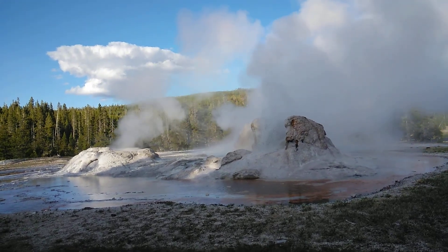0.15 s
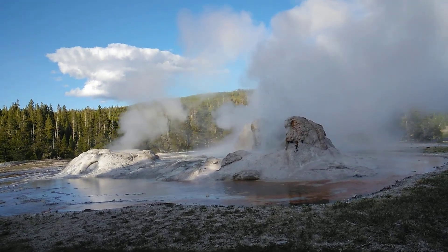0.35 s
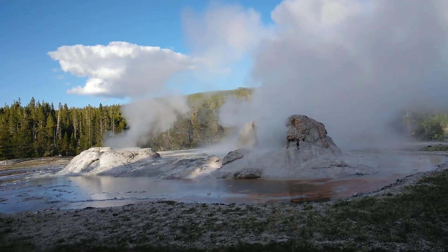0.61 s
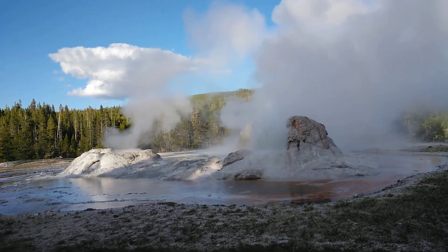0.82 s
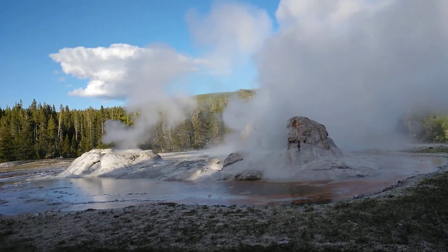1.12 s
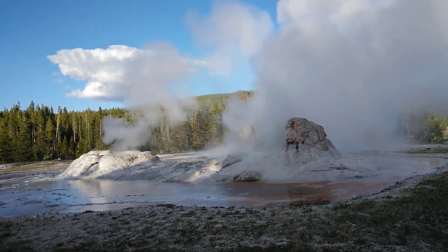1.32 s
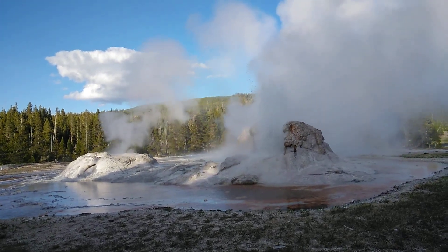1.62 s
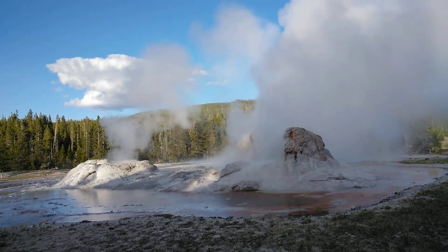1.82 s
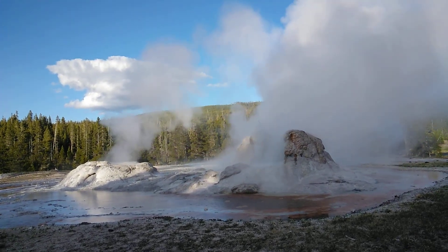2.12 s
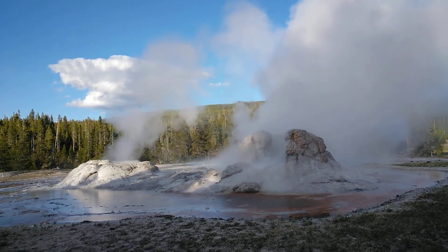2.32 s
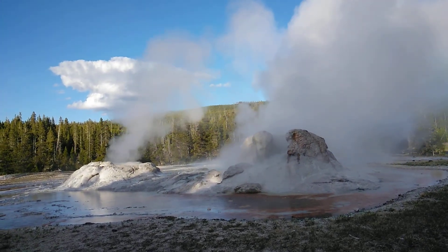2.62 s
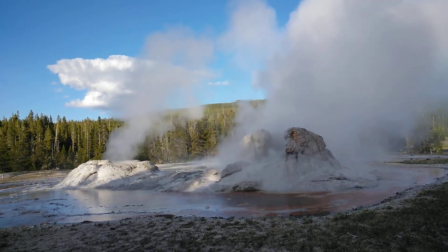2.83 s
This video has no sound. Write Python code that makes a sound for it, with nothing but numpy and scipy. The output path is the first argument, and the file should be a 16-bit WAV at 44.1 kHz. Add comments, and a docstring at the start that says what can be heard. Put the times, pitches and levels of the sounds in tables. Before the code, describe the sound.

Geyser eruption: bright steamy spray swells, crackles with sharp water slaps, then sinks to thin hiss

```python
"""A geyser throws up water and steam in surges: noise for the steam, random impacts for the spray.
Lumps of water slap on wet rock as short ringing bursts, and heavier water falls back with a duller spatter.
The pool churns below as noise with rising bubble tones; one low thud marks a mass of water landing.
A steady vent hisses to the left over a low wind rumble, both filtered noise.
The two microphone sides are almost opposed in the bass; the left is much brighter."""
import sys
import numpy as np
from scipy import signal
from scipy.fft import rfft, irfft, next_fast_len
from scipy.io import wavfile
from scipy.ndimage import uniform_filter1d, map_coordinates

SR = 44100
rng = np.random.default_rng(int(sys.argv[2]) if len(sys.argv) > 2 else 0)


def generate_wav(signal):
    """Clip the signal to [-1, 1] and save it as 16-bit WAV at the path in sys.argv[1]."""
    frames = np.transpose(np.atleast_2d(signal))
    scaled = np.clip(frames, -1, 1) * 32767
    pcm = np.round(scaled).astype(np.int16)
    wavfile.write(sys.argv[1], SR, pcm)


N = 132300

# Spectrum of spray and slaps. Each row: frequency in Hz, relative density in dB per Hz.
SPRAY_COLOUR = [(900, -33.5), (1320, -18.5), (1600, -15), (2000, -16), (2400, -12.5), (2750, -7.5),
                (3150, -13), (3600, -14.5), (4050, -9), (4400, -4), (4980, 1), (5600, -6.5), (6500, -8.5),
                (7600, -5.5), (8400, -7), (9700, -2), (11500, -5.5), (12700, -12), (14300, -23),
                (15500, -46)]


def amp(db):
    """Decibels to gain."""
    return 10 ** (np.asarray(db) / 20)


def unit(x):
    """Scaled to rms 1."""
    return x / np.sqrt(np.mean(x ** 2) + 1e-20)


def along(points, hz):
    """(Hz, value) points interpolated on a log frequency axis."""
    f, v = np.transpose(points)
    return np.interp(np.log(hz + 1), np.log(f + 1), v)


def curve(rows):
    """(s, value) points interpolated to one value per sample."""
    return np.interp(np.arange(N) / SR, *np.transpose(rows))


def wobble(knots_per_s):
    """A smooth random curve through normally distributed knots."""
    knots = rng.standard_normal(1024)
    return map_coordinates(knots, [np.arange(N) * knots_per_s / SR], mode="wrap")


def coloured(x, spectrum):
    """x through a minimum-phase filter with the given spectrum and unit power gain."""
    m = 2 * next_fast_len(N)
    gain = unit(amp(along(spectrum, np.fft.rfftfreq(m, 1 / SR))))
    cepstrum = irfft(np.log(gain + 1e-6))
    # fold the cepstrum to make the filter causal
    cepstrum[1:m // 2] *= 2
    cepstrum[m // 2 + 1:] = 0
    response = np.exp(rfft(cepstrum))
    return irfft(rfft(x, m) * response, m)[..., :N]


def patchy(x):
    """Flickers from band to band: random gain patches, some hundred Hz wide and tens of ms long."""
    patch_rms_db = 1
    z = signal.stft(x, nperseg=512)[2]
    patches = rng.standard_normal(z.shape[1:])
    patches = uniform_filter1d(patches, size=8, axis=0)  # bins
    patches = uniform_filter1d(patches, size=6, axis=1)  # frames
    return signal.istft(z * amp(patch_rms_db * unit(patches)), nperseg=512)[1][:, :N]


def bursts(power, t60_s):
    """Two noises that flare at each contact and die away."""
    keep = np.exp(-2 * np.log(1000) / (t60_s * SR))  # power kept per sample
    envelope = np.sqrt(signal.lfilter([1], [1, -keep], power))
    return envelope * rng.standard_normal((2, N))


def drops(rate_per_s, spread_db, t60_s):
    """Random impacts of many sizes, at rms 1."""
    size = amp(spread_db * np.minimum(rng.standard_normal(N), 2.7))
    hits = rng.random(N) < rate_per_s / SR
    return unit(bursts(hits * size ** 2, t60_s))


def bubbles(rate_per_s, centre_hz, octaves, life_cycles):
    """Decaying tones of scattered size and pitch that rise as they fade, at rms 1."""
    rise_per_life = 0.13  # fraction of the starting pitch
    start, pitch, size, turn = rng.random((int(rate_per_s * N / SR), 4)).T[:, :, None]
    n = np.arange(SR // 40)
    cycles = centre_hz * 2 ** (octaves * (pitch - .5)) * n / SR
    age_lives = cycles / life_cycles
    strength = amp(23.5 * size - 22.6 * age_lives)
    phase = 2 * np.pi * cycles * (1 + rise_per_life * age_lives / 2)
    at = ((start * N).astype(int) + n).ravel()
    sides = []
    for shift in (0, 2 * np.pi * turn):  # random phase between the two channels
        tones = strength * np.sin(phase + shift)
        sides.append(np.bincount(at, tones.ravel(), N)[:N])
    return unit(np.array(sides))


def spray():
    """Steam noise, drop impacts and tiny ringing bubbles share the surge; drops arrive in clumps."""
    # Strength of the eruption. Each row: time in seconds, level in dB before the layer gains.
    surge = [(0, -46), (.2, -44), (.35, -41), (.46, -34), (.55, -36), (.65, -31.5), (.72, -35), (.84, -34),
             (.95, -30.5), (1.03, -27.5), (1.09, -27), (1.15, -30.5), (1.35, -33), (1.57, -38.5),
             (1.67, -35.5), (1.9, -36), (2.1, -32.5), (2.4, -34), (2.53, -35.5), (2.7, -40.5),
             (2.88, -53.5), (3, -55.5)]
    steam_db, patter_db, plink_db = 3.5, 1, -6
    steam = amp(steam_db) * rng.standard_normal((2, N))
    clumps_db = 1.0 * wobble(29.76) + 2.14 * wobble(100)
    impacts = drops(rate_per_s=3900, spread_db=3, t60_s=0.0018)
    patter = amp(patter_db) * unit(amp(clumps_db) * impacts)
    # drops that ring in the wet
    plinks = amp(plink_db) * bubbles(rate_per_s=700, centre_hz=5090, octaves=2.665, life_cycles=41)
    mix = patchy(steam + patter) + plinks
    return coloured(amp(curve(surge)) * mix, SPRAY_COLOUR)


def slaps():
    """Lumps of water spread and burst on rock; the air pocket under each rings briefly."""
    # Each row: start in seconds, relative level in dB, burst t60 in seconds, ring in Hz.
    lumps = [(.400, -28, .012, 5000), (.4544, -23.5, .02, 5000), (.4665, -21, .03, 5000),
             (.473, -25, .018, 5000), (.4998, -26, .022, 5100), (.532, -26, .025, 6500),
             (.581, -25.5, .018, 4800), (.6078, -22.5, .014, 4100), (.6365, -24, .018, 4900),
             (.6648, -20, .006, 7500), (.6688, -14.5, .012, 4400), (.6822, -17, .009, 4000),
             (.7638, -13, .004, 7300), (.799, -19, .004, 5000), (.8845, -16, .012, 5700),
             (.9125, -22, .01, 4800), (.9822, -18, .012, 5000), (1.0295, -10, .005, 5000),
             (1.034, -12, .011, 9500), (1.056, -14, .009, 5200), (1.0795, -13, .008, 5000),
             (1.0882, -5, .009, 9500), (1.116, -15, .007, 7000), (1.1915, -13, .007, 9500),
             (1.2612, -15, .005, 7500), (1.6945, -19, .01, 5100), (1.996, -21, .025, 6000),
             (2.538, -18, .007, 5000), (2.607, -20, .008, 4000), (2.836, -31, .012, 9000)]
    rise_s, ring_db, ring_q = .0005, 4, 5
    out = np.zeros((2, N + SR))
    t = np.arange(SR // 10) / SR
    for start_s, level_db, t60_s, ring_hz in lumps:
        envelope = amp(level_db - 60 * t / t60_s) * (1 - np.exp(-t / rise_s))
        burst = envelope * rng.standard_normal((2, len(t)))
        ring = signal.lfilter(*signal.iirpeak(ring_hz, ring_q, SR), burst)
        first = round(start_s * SR)
        out[:, first:first + len(t)] += (burst + amp(ring_db) * ring) / 2
    return coloured(out[:, :N], SPRAY_COLOUR)


def splash():
    """Heavier water falls back: dense, longer impacts with a duller spectrum."""
    # Each row: time in seconds, level in dB before the layer gain.
    fall = [(0, -47.5), (.17, -46), (.3, -46), (.48, -40.5), (.6, -45), (.68, -37.5), (.73, -45),
            (.85, -46.5), (1.06, -39), (1.35, -46), (1.57, -44), (1.7, -41.5), (2.02, -41), (2.1, -34),
            (2.2, -38.5), (2.5, -39.5), (2.6, -44.5), (2.72, -44), (2.82, -56), (3, -73)]
    # Each row: frequency in Hz, relative density in dB per Hz.
    colour = [(900, -26.5), (1350, -3.5), (1600, 5.5), (2000, -1), (2400, 5.5), (2750, 0.5), (3050, -6),
              (3400, 1.5), (4200, 2), (6000, -1), (10000, -36)]
    gain_db = 3.5
    spatter = coloured(patchy(drops(rate_per_s=1900, spread_db=0.5, t60_s=0.016)), colour)
    return amp(curve(fall) + gain_db + 0.13 * wobble(27.1)) * unit(spatter)


def thud():
    """The ground gives one low thud as a mass of water lands: decaying noise, alike on both sides."""
    # Each row: frequency in Hz, relative density in dB per Hz.
    colour = [(30, -15), (60, 4), (130, -6), (250, -1.5), (400, -21), (900, -53)]
    start_s, level_db, rise_s, t60_s = 0.85, -41, 0.0051, 0.16
    t = np.maximum(np.arange(N) / SR - start_s, 0)
    envelope = amp(level_db - 60 * t / t60_s) * (1 - np.exp(-t / rise_s))
    return envelope * unit(coloured(rng.standard_normal(N), colour))


def pool():
    """Small rising bubbles ring over the noise wash of the churning pool."""
    # Each row: time in seconds, level in dB before the layer gain.
    churn = [(0, -58), (.17, -61), (.24, -54.5), (.47, -54.5), (.68, -53.5), (.75, -57.5), (1.03, -54.5),
             (1.17, -55), (1.26, -56), (1.36, -53), (1.48, -51), (1.57, -56.5), (1.66, -52.5),
             (1.92, -53.5), (2.07, -52), (2.25, -52.5), (2.5, -51.5), (2.6, -59.5), (2.72, -58),
             (2.81, -84), (3.0, -83)]
    # Each row: frequency in Hz, relative density in dB per Hz.
    colour = [(300, -21), (420, 0.5), (500, -7.5), (580, -11), (720, -2.5), (850, -1.5), (1050, -2),
              (1320, -9.5), (1600, -9), (1800, -22), (3000, -39)]
    gain_db, gurgle_db = 11, -9.5
    wash = unit(coloured(patchy(rng.standard_normal((2, N))), colour))
    rings = bubbles(rate_per_s=260, centre_hz=1097, octaves=1.76, life_cycles=33)
    gurgle = unit(coloured(rings, colour))
    level = amp(curve(churn) + gain_db + 1.44 * wobble(14))
    return level * unit(wash + amp(gurgle_db) * gurgle)


def vent():
    """A thin, hollow hiss of steam, steady, laid bare between the surges."""
    # Each row: frequency in Hz, relative density in dB per Hz.
    colour = [(300, -10), (450, -5), (590, -19), (720, 3.5), (1000, 4), (1130, -1), (1260, -23),
              (1500, -22), (1700, 2.5), (1850, -3.5), (2000, 5.5), (2250, 1.5), (2500, -4.5), (2730, 0),
              (3200, -1.5), (3600, -8.5), (4400, 3), (5000, 5.5), (5700, -1), (6600, -7), (7600, -5),
              (8500, -14), (10000, -2.5), (12000, -11), (15000, -38)]
    level_db = -46
    hiss = unit(coloured(patchy(rng.standard_normal((2, N))), colour))
    return amp(level_db + .8 * wobble(12)) * hiss


def wind():
    """A low noise rumble that swells and dips."""
    # Each row: time in seconds, level in dB.
    gusts = [(0, -39.5), (.08, -35.5), (.19, -39), (.27, -34.5), (.52, -35.5), (.56, -40.5), (.6, -33.5),
             (.65, -41.5), (.7, -34), (.78, -38), (.95, -39), (1.1, -33), (1.18, -36.5), (1.24, -38.5),
             (1.34, -36.5), (1.49, -36.5), (1.53, -45), (1.6, -37), (1.75, -36.5), (2.03, -36),
             (2.06, -42.5), (2.12, -34), (2.3, -39), (2.47, -35), (2.65, -38.5), (2.84, -41), (3, -39)]
    # Each row: frequency in Hz, relative density in dB per Hz.
    colour = [(20, -14.5), (40, -22), (58, -3.5), (110, 0.5), (170, -2.5), (260, -4), (330, -9.5),
              (450, -18), (560, -44), (900, -47.5)]
    rumble = unit(coloured(rng.standard_normal((2, N)), colour))
    return amp(curve(gusts) + 0.32 * wobble(10.55)) * rumble


def microphones(field):
    """Left takes the direct sound; right a duller, partly diffuse version, its lag drifting at random."""
    # Each row: frequency in Hz, left over right in dB.
    balance = [(50, .3), (300, 2), (500, 2), (600, 7), (850, 2.8), (1050, 4.3), (1300, 1.5), (1600, 4.8),
               (2000, 3), (2400, 4), (2730, 7), (2930, .3), (3060, 0), (3190, -3.5), (3600, 3.8),
               (4100, .8), (4500, 13.7), (5000, 12.5), (5600, 7.9), (6600, 8.1), (8000, 12.4),
               (10000, 21.3), (12000, 21), (14500, 14)]
    # Each row: frequency in Hz, phase by which left leads in radians.
    lead = [(60, -2.8), (500, -2.9), (1150, -2.7), (1500, -1.9), (1850, -2.2), (2650, -1.7), (2930, -3.05),
            (3060, -3.2), (3250, -6.1), (3900, -6.3), (4350, -5.4), (4700, -6.3), (5600, -6.4),
            (7300, -4.6), (9200, -3.6), (12000, -4.7)]
    # Each row: frequency in Hz, likeness of the sides from 0 to 1.
    likeness = [(30, .95), (100, .99), (250, .99), (450, .92), (570, .68), (800, .9), (1100, .85),
                (1320, .72), (1550, .82), (2000, .5), (2600, .68), (2780, .55), (2930, .99), (3060, .99),
                (3150, .3), (3330, .96), (3450, .9), (3650, .52), (3900, .96), (4080, .9), (4480, .3),
                (4700, .55), (5000, .6), (5300, .42), (6500, .38), (10000, .22), (14000, .1)]
    drift_us, drift_knots_per_s = 22, 10
    m = 2 * next_fast_len(N)
    hz = np.fft.rfftfreq(m, 1 / SR)
    direct, diffuse = rfft(field, m)
    alike = np.clip(along(likeness, hz), 0, .999)
    right = alike * direct + np.sqrt(1 - alike ** 2) * diffuse
    right = right * amp(-along(balance, hz)) * np.exp(-1j * along(lead, hz))
    drift_samples = drift_us * SR / 10 ** 6 * wobble(drift_knots_per_s)
    drifted = map_coordinates(irfft(right, m)[:N], [np.arange(N) + drift_samples], mode="mirror")
    return np.array([field[0], drifted])


def scene():
    """The eruption and the wind at the microphone pair, with the vent to the left."""
    vent_right_db = -12
    eruption = microphones(spray() + slaps() + splash() + pool() + wind()) + thud()
    return eruption + microphones(vent()) * amp([[0], [vent_right_db]])


def record(dry):
    """A sharp band limit: nothing above it is kept."""
    top_hz = 15700
    m = 2 * next_fast_len(N)
    kept = np.fft.rfftfreq(m, 1 / SR) < top_hz
    return irfft(rfft(dry, m) * kept, m)[:, :N]


dry = scene()
out = record(dry)
generate_wav(out)
```